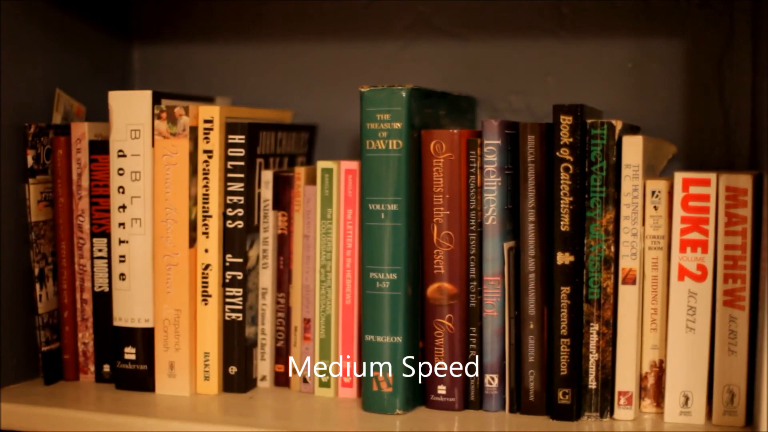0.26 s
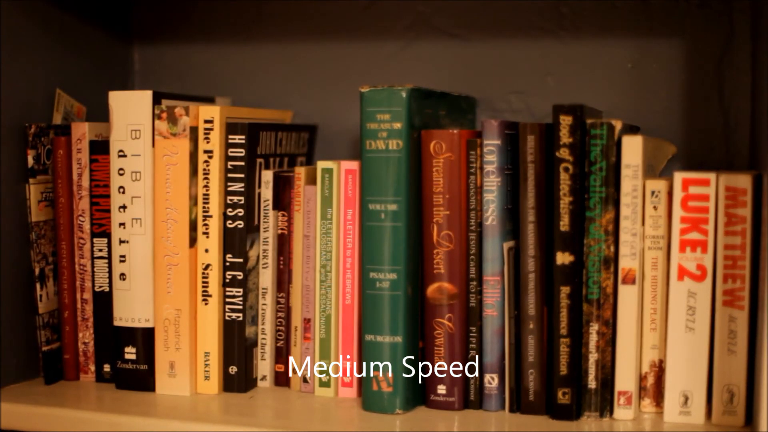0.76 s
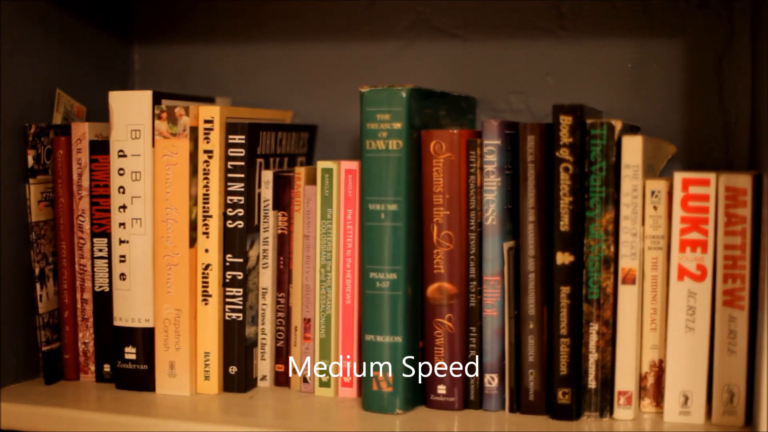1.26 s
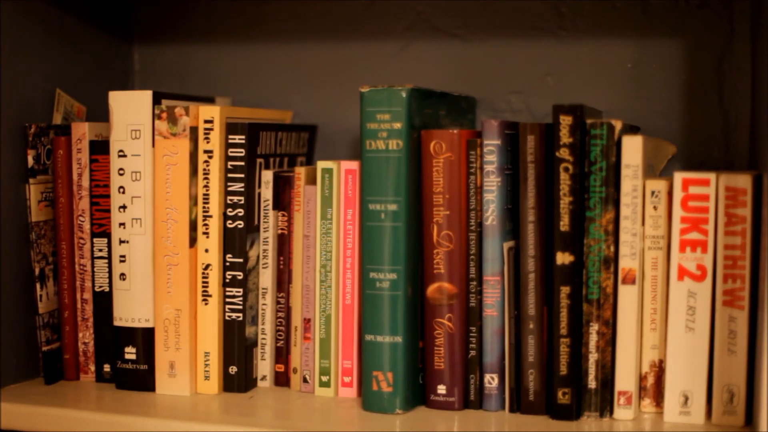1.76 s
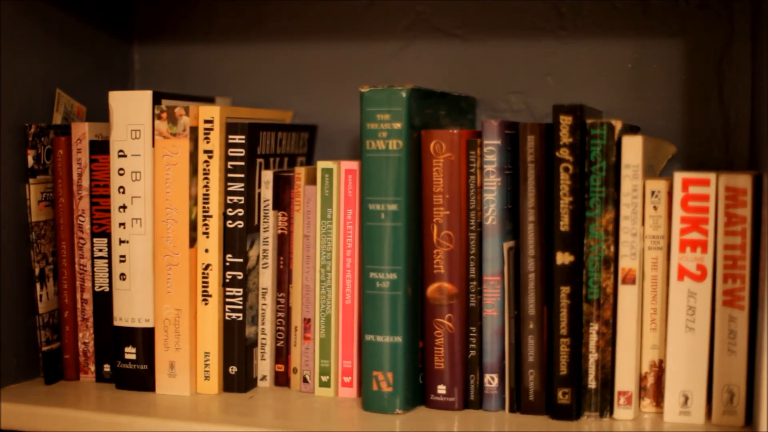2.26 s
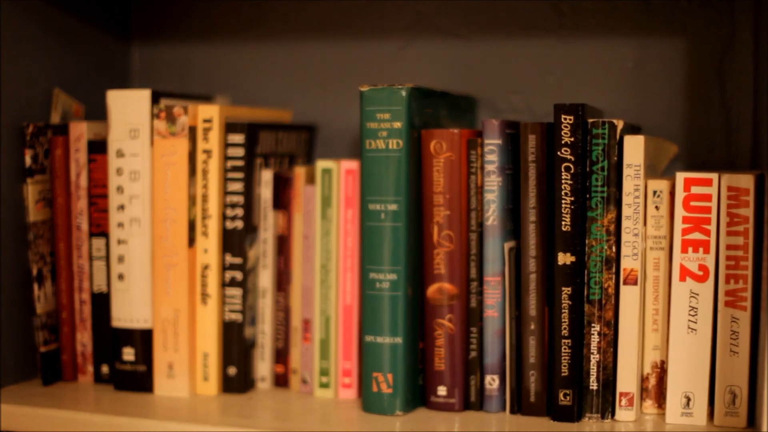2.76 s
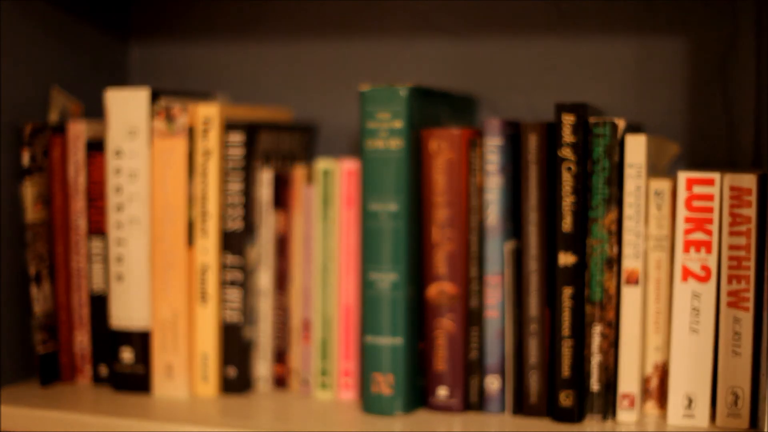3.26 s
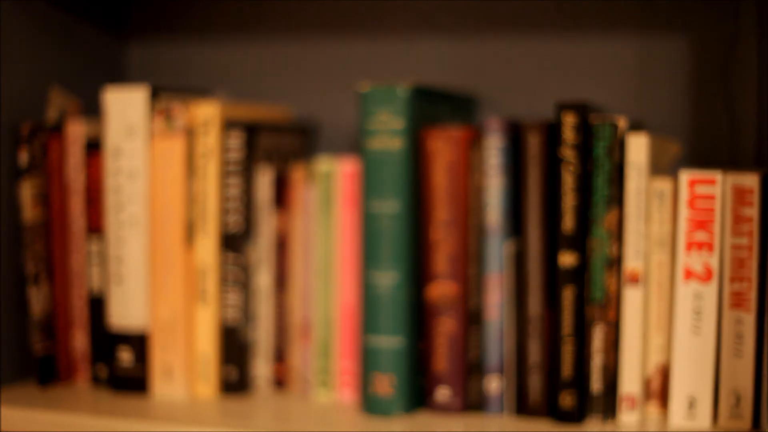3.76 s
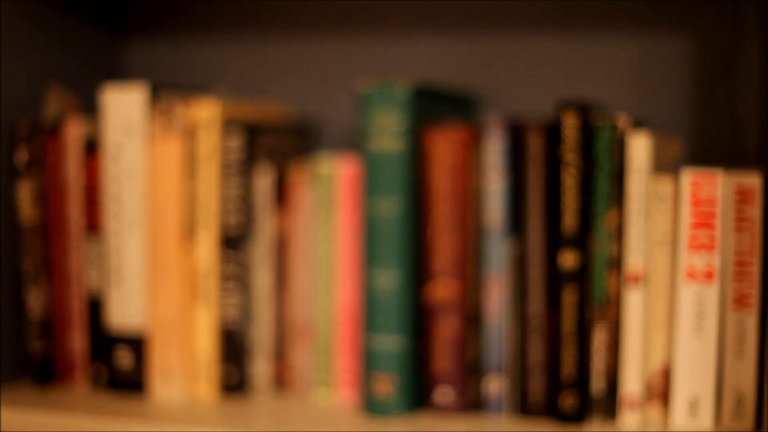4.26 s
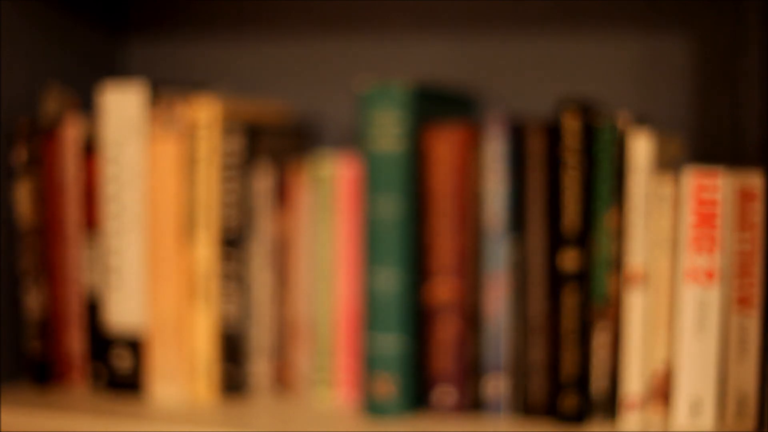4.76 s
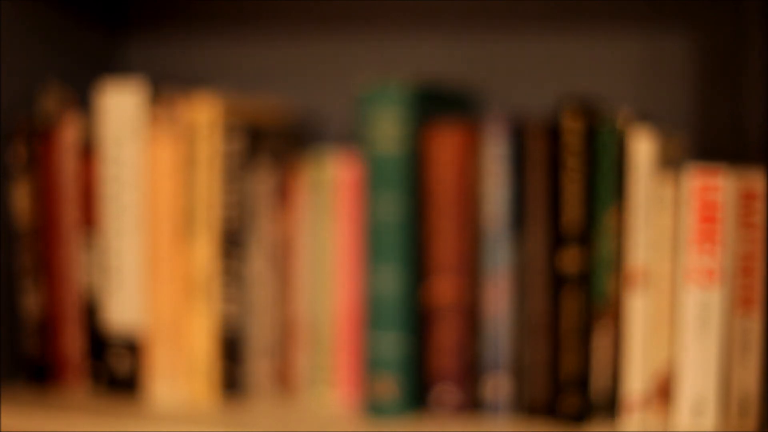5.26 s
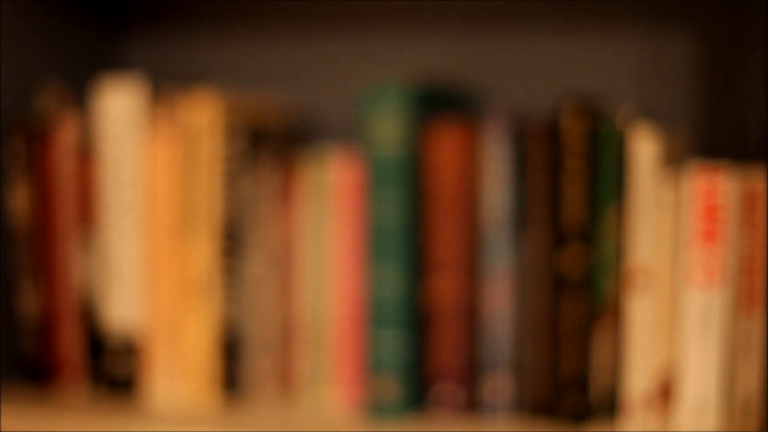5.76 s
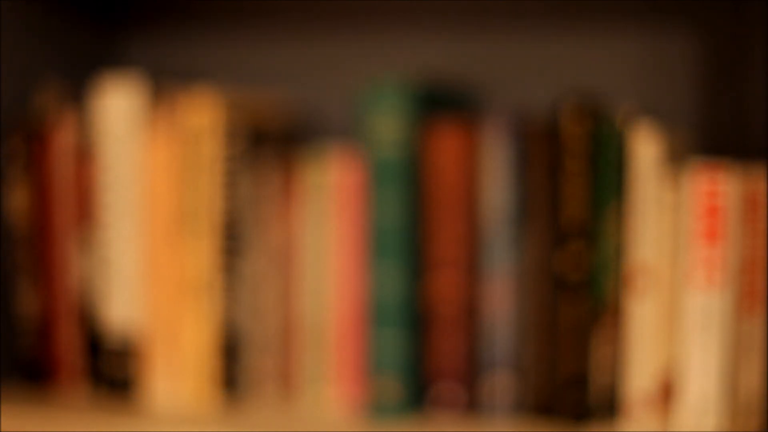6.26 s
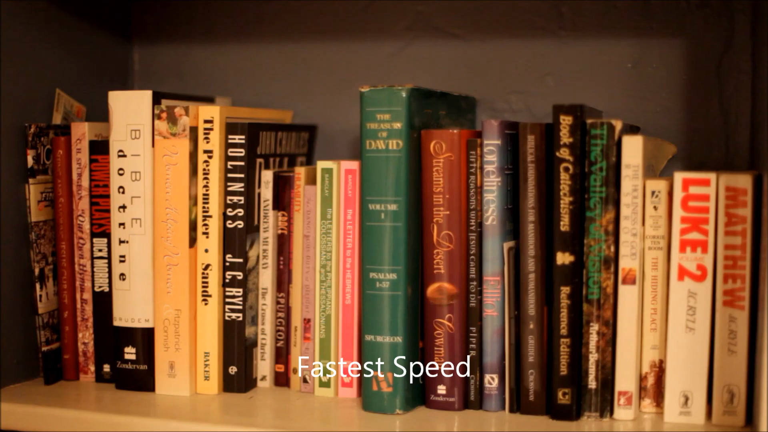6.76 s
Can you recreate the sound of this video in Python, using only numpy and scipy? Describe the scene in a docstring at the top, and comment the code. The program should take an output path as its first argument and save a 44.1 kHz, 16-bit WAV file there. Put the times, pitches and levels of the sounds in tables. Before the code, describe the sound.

Close, dry clicks of a camera lens focusing: a few steps, a pause, a button press, then a long, steady run.

```python
"""In a quiet room, a camera lens focuses in small steps, about ten a second, heard from the camera body.
In each step the motor ticks on, the gears close their slack, run for some 35 ms and stop with a clack
that rings the lens barrel. Where the lens drags, a step lasts longer and ends harder; the gears' ring
rises and falls as they turn. After a few steps and a pause, a button press opens a long run.
Under it all lie microphone hiss, a faint hum and a thin whine."""
import sys
import numpy as np
from scipy import signal
from scipy.fft import rfft, irfft
from scipy.io import wavfile

SR = 44100
rng = np.random.default_rng(int(sys.argv[2]) if len(sys.argv) > 2 else 0)


def int16_out(signal):
    """Quantize to a 16-bit WAV file."""
    q = np.round(np.clip(np.atleast_2d(signal).T, -1, 1) * 32767)
    wavfile.write(sys.argv[1], SR, q.astype(np.int16))


N = 308700
TIME = np.arange(N) / SR
AGE = np.arange(SR // 3) / SR   # seconds since a contact

# focus steps: start t/s, stop t/s, tick level/dB, level/dB of the clack's middle ring near 2 kHz
FOCUS_STEPS = [(-0.062, -0.027, -44, -27), (0.0631, 0.0955, -54, -35.5), (0.1472, 0.1792, -51, -40),
               (0.2706, 0.3037, -46, -32.5), (2.2168, 2.301, -38.5, -42.5), (2.3133, 2.349, -48.5, -35.5),
               (2.4257, 2.463, -42.5, -33.0), (2.5245, 2.5625, -40.0, -32), (2.6145, 2.6537, -39.5, -31.5),
               (2.7194, 2.7586, -40.5, -29), (2.8133, 2.8524, -39.5, -28.5), (2.9091, 2.9477, -43, -30.5),
               (3.0182, 3.0559, -44.5, -35), (3.115, 3.1563, -43, -32.5), (3.2237, 3.263, -47.0, -32.0),
               (3.3133, 3.3512, -43, -33), (3.4116, 3.4446, -38.0, -44.5), (3.521, 3.5548, -44.5, -39),
               (3.616, 3.6506, -38, -31.5), (3.7206, 3.7549, -37.5, -29), (3.8146, 3.8481, -38, -29),
               (3.9112, 3.943, -42.5, -34.5), (4.0194, 4.0548, -50, -34.5), (4.1155, 4.1495, -41, -35.5),
               (4.219, 4.2517, -46, -36.0), (4.3127, 4.3472, -45, -34), (4.409, 4.4426, -49.5, -38),
               (4.52, 4.5545, -41, -35), (4.6165, 4.652, -39.5, -31.5), (4.7196, 4.758, -43.5, -30),
               (4.816, 4.8553, -45.5, -31.0), (4.9106, 4.9505, -46.0, -31.5), (5.0212, 5.0602, -38.5, -29),
               (5.1178, 5.1573, -43, -35), (5.2161, 5.2567, -42.5, -33.5), (5.3158, 5.3572, -39.0, -29.5),
               (5.4119, 5.454, -42, -29.5), (5.524, 5.563, -42.5, -33), (5.6173, 5.6553, -41.5, -34),
               (5.7167, 5.7513, -42.5, -31.5), (5.8154, 5.851, -48, -32.0), (5.9102, 5.9446, -41.5, -32),
               (6.0232, 6.0574, -39.0, -31.0)]

# A mode is one tone of a struck part; t60 is the time it takes to fade by 60 dB.
# lens barrel: f/Hz, level/dB, t60/s
BARREL_MODES = [(617, -10.5, 0.015), (767, -12.5, 0.044), (892, -13.5, 0.045), (1014, -17, 0.072),
                (1083, -22, 0.035), (1248, -21, 0.058), (1414, -18.5, 0.041), (1668, -15, 0.036),
                (1860, -17, 0.056), (1998, -17, 0.029), (2174, -12, 0.022), (2680, -13.5, 0.027),
                (3043, -12, 0.014), (3300, -26, 0.04), (3685, -23.5, 0.023), (3880, -21.5, 0.031),
                (4190, -24, 0.022), (4810, -26.5, 0.02), (5190, -23, 0.027), (5540, -26, 0.027),
                (5970, -17, 0.014), (6900, -29, 0.027), (7340, -18, 0.0079), (8690, -13, 0.0047),
                (9170, -17.5, 0.01), (9910, -11.5, 0.0083), (11070, -21.5, 0.01), (12260, -22, 0.0044),
                (13100, -12, 0.0031)]
# how much of a harder stop reaches each barrel mode: f/Hz, factor
HARDNESS_FACTORS = [(2200, 0), (3300, 0.96), (5800, 1.7), (9500, 1), (14000, .4)]
# change in the barrel's sound per 200 Hz rise of the gears' ring: f/Hz, level/dB
TIGHTNESS_COLOUR = [(600, 1), (760, -1), (900, 4.5), (1080, 5.5), (1250, 4.5), (1700, -1.5), (1900, 1),
                    (3000, 0), (3800, -4), (4500, -0.5)]
# pitch of the gears' ring, higher where they fit tighter: t/s, f/Hz
GEAR_PITCH = [(0.3, 1775), (2.2, 1896), (2.6, 2060), (2.9, 1775), (4.1, 1680), (4.4, 1677), (4.55, 2040),
              (4.9, 1980), (5.4, 1810), (5.7, 1700)]
# gears as they meet: multiple of that pitch, level/dB, t60/s
GEAR_MODES = [(0.062, -12, 0.046), (0.158, -9, 0.026), (.29, -10, 0.03), (.48, -8.5, 0.016),
              (0.659, -17, 0.015), (.9, -13, 0.033), (1, -3, 0.026), (1.14, -4, 0.019)]
# gear housing: f/Hz, level/dB, t60/s
HOUSING_MODES = [(2610, -8, 0.034), (3352, -2, 0.018), (4160, -13, .015), (5300, -11, 0.017),
                 (6300, -14.5, 0.013), (6700, -9, 0.0098)]
# the motor's drive ring: f/Hz, level/dB, t60/s
MOTOR_MODES = [(1030, -6, 0.027), (2340, -5.5, 0.065), (3740, -10, 0.013), (5600, -3.5, 0.028),
               (6580, 0.5, 0.01), (7290, 0, 0.015), (8730, 1.5, 0.01), (9570, 8.5, 0.0046),
               (10650, -4, 0.0092), (12170, -4.5, 0.0059), (13800, -8.5, 0.0056)]
# camera body: f/Hz, level/dB, t60/s
BODY_MODES = [(88, -29, 0.0095), (183, -2.5, 0.011), (270, -9, 0.027), (270, -35.5, 0.3),
              (299.5, -21, 0.11), (300, -13.5, 0.051), (379.6, -34, 0.15)]
# lens rocking back against the gears: f/Hz, level/dB, t60/s
REBOUND_MODES = [(950, -6, 0.023), (1610, -9.5, 0.027), (1876, -11.5, 0.011), (2014, 0.5, 0.029)]
# ring of a small metal part as the lens moves along: t/s, level/dB
TING_LEVELS = [(0.3, -55), (2.4, -65.5), (2.75, -40.5), (3.3, -45), (3.8, -58), (4.3, -47.5), (5.0, -69),
               (6.1, -59)]
# button: f/Hz, level/dB, t60/s
BUTTON_MODES = [(333, -17.5, .03), (625, -5.5, 0.018), (933, -2.5, .018), (1960, -15.5, 0.028),
                (2065, -9, 0.032), (2676, 6, 0.018), (3240, -11, 0.0193), (4240, 5, 0.0047),
                (5470, 1.5, 0.0096), (6550, -13, 0.02), (7900, -2, .006)]
# clicks of the button: t/s, level/dB
BUTTON_CLICKS = [(2.2318, -36), (2.2361, -33), (2.2513, -38.5), (2.2669, -26), (2.2729, -31),
                 (2.2804, -42.5)]
# a finger settling on the button: t/s, level/dB
FINGER_LEVELS = [(2.09, -80), (2.13, -55), (2.16, -54), (2.21, -56), (2.3, -52), (2.36, -80)]

# A colour says how strong a noise is from low to high pitch.
# crack of a contact: f/Hz, level/dB
CRACK_COLOUR = [(60, -14.5), (300, 8.5), (450, 0), (900, 2), (2100, 13), (2450, 1.5), (3100, 5), (4500, -5),
                (5800, -11.5), (8000, -1), (9700, -2), (11500, -15.5), (14000, -10.5), (16500, -23.5)]
# rubbing gear teeth: f/Hz, level/dB
WHIRR_COLOUR = [(40, -34.5), (80, 2), (140, 0), (230, -6), (600, -3), (1300, -3), (1750, 3.5), (2200, -1),
                (2800, -10), (4300, -13.5), (5500, -13), (8000, -16), (9700, -14), (11500, -33.5)]
# rubbing fingertip: f/Hz, level/dB
FINGER_COLOUR = [(130, -8), (220, 0), (450, 0), (1200, -3), (2500, -13), (8000, -28)]
# the room's soft, low echo: f/Hz, level/dB
ROOM_COLOUR = [(120, -12), (230, -15), (275, -1), (300, 3.5), (335, -16), (420, -23), (650, -13.5),
               (2000, -24.5), (6000, -27), (14000, -37)]
# microphone hiss: f/Hz, level/dB
HISS_COLOUR = [(30, 0), (60, -1), (110, .5), (290, 1), (500, -3.5), (1000, -5.5), (2000, -7), (4000, -8.5),
               (7000, -10), (10000, -13.5), (15800, -17.5)]

# mains hum and the whine of the electronics: f/Hz, level/dB
STEADY_TONES = [(120, -77.5), (5609, -72)]


def stop_clacks(clack_db, middle_hz, middle_width_hz, snap_db, snap_dull_hz, tip_db):
    """The lens stops against its gears and rings the barrel; a harder stop sounds brighter."""
    out, shapes = np.zeros(N), steady_modes(BARREL_MODES, swell_s=0.001, span_s=0.014)
    hz = np.array(BARREL_MODES)[:, 0]
    reach, mesh_db = look_up(HARDNESS_FACTORS, hz), look_up(TIGHTNESS_COLOUR, hz)
    middle = np.exp(-((hz - middle_hz) / middle_width_hz) ** 2)
    dull = signal.butter(1, snap_dull_hz, fs=SR, output="sos")
    for start, stop, _, middle_db in FOCUS_STEPS:
        harder_db = 900.5 * drag_s(start, stop)   # about 0.9 dB per extra millisecond
        fuller_db = middle_db + 34   # the usual middle ring is -34 dB
        boost_db = harder_db * reach + tightness(start) * mesh_db + fuller_db * middle
        ring = strike(shapes, vary_db=1.17, scatter=0.8, boost_db=boost_db)
        ring = rattle(ring, rattle_db=-5, t60=0.004, above_hz=3000)
        snap = signal.sosfilt(dull, crack(t60=0.022, tail_db=-2, tail_t60=0.079))
        snap *= from_db(snap_db + 0.88 * fuller_db)
        bright = from_db(tip_db + 0.49 * harder_db) * crisp_tip(t60=0.01, above_hz=8900)
        add(out, stop, from_db(clack_db) * (ring + snap + bright))
    return out


def gears_meeting(slack_s, early_db, full_db, housing_db):
    """The gears close their slack: a light touch, then a full one. Both also ping the housing."""
    out, housing = np.zeros(N), mode_shapes(HOUSING_MODES, swell_s=0.0004)
    for start, stop, *_ in FOCUS_STEPS:
        ring_hz = look_up(GEAR_PITCH, start)
        step_db = -39 - 300 * drag_s(start, stop)   # drag softens the contact
        shapes = mode_shapes([(k * ring_hz, db, t60) for k, db, t60 in GEAR_MODES], swell_s=0.0025)
        for share, db in ((0.6, early_db), (1, full_db)):
            ring = level_one(strike(shapes, vary_db=1.8, scatter=0.6), span_s=0.009)
            ping = from_db(housing_db) * strike(housing, vary_db=1.2, scatter=0.72)
            grit = from_db(-1) * crack(t60=0.014, tail_db=-22, tail_t60=0.05)
            when = start + share * slack_s + rng.normal(0, 0.0004)
            add(out, when, from_db(step_db + db) * (ring + ping + grit))
    return out


def running_gears(spin_up_s, coast_s, grain_db, grains_hz):
    """Gear teeth rub unevenly through each step, and the whirr dies away after the stop."""
    drive = np.zeros(N)
    spin_up = 1 - np.exp(-(AGE / spin_up_s) ** 2)
    for start, stop, *_ in FOCUS_STEPS:
        run_db = -44 - 282 * drag_s(start, stop)   # drag makes the gears run more quietly
        coast = np.exp(-np.maximum(AGE - (stop - start), 0) / coast_s)
        add(drive, start, from_db(run_db) * spin_up * coast)
    grain = np.interp(TIME * grains_hz, np.arange(N), rng.standard_normal(N))
    return drive * from_db(grain_db * grain - 1.23) * noise(WHIRR_COLOUR, N)


def motor_ticks():
    """The motor switches on with a thin, bright tick."""
    out, shapes = np.zeros(N), mode_shapes(MOTOR_MODES, swell_s=0.00033)
    for start, _, tick_db, _ in FOCUS_STEPS:
        tick = level_one(strike(shapes, vary_db=1.5, scatter=0.99), span_s=0.0024)
        bright = from_db(-5.5) * crisp_tip(t60=0.008, above_hz=6400)
        add(out, start, from_db(tick_db + 0.9) * (tick + bright))
    return out


def body_thumps(usual_db):
    """Each stop nudges the whole camera: a low thump, softer where the gears fit tighter."""
    out, shapes = np.zeros(N), steady_modes(BODY_MODES, swell_s=0.0012, span_s=0.023)
    for start, stop, *_ in FOCUS_STEPS:
        thump = strike(shapes, vary_db=0.48, scatter=0.54)
        add(out, stop, from_db(usual_db - 2 * tightness(start)) * thump)
    return out


def rebounds(delay_s, rebound_db):
    """Just after each stop the lens rocks back: a softer contact with only middle tones."""
    out, shapes = np.zeros(N), mode_shapes(REBOUND_MODES, swell_s=0.00059)
    for _, stop, _, middle_db in FOCUS_STEPS:
        ring = level_one(strike(shapes, vary_db=2.0, scatter=0.8), span_s=0.008)
        add(out, stop + delay_s + rng.normal(0, 0.00028), from_db(middle_db + rebound_db) * ring)
    return out


def metal_tings(hz, t60):
    """At some lens positions a small metal part rings on after the clack, thin and high."""
    out, ring = np.zeros(N), np.sin(2 * np.pi * hz * AGE) * fade(t60)
    for _, stop, *_ in FOCUS_STEPS:
        add(out, stop, from_db(look_up(TING_LEVELS, stop)) * ring)
    return out


def button_press(dull_hz):
    """A fingertip rubs on the camera, then the button clicks down, muffled by the finger."""
    clicks, shapes = np.zeros(N), mode_shapes(BUTTON_MODES, swell_s=0.00064)
    for when, db in BUTTON_CLICKS:
        ring = level_one(strike(shapes, vary_db=2.0, scatter=0.8), span_s=0.003)
        snap = from_db(-5) * crack(t60=0.035, tail_db=-18, tail_t60=0.091)
        add(clicks, when, from_db(db) * (ring + snap))
    muffled = signal.sosfilt(signal.butter(4, dull_hz, fs=SR, output="sos"), clicks)
    rub = from_db(look_up(FINGER_LEVELS, TIME)) * noise(FINGER_COLOUR, N)
    return muffled + rub


def room_echo(room_db, t60, build_s):
    """Sound scattered around the room builds up after each clack and dies away."""
    out = np.zeros(N)
    bloom = (1 - np.exp(-(AGE / build_s) ** 2)) * fade(t60)
    for _, stop, *_ in FOCUS_STEPS:
        add(out, stop, from_db(room_db) * bloom * noise(ROOM_COLOUR, len(AGE)))
    return out


def background(hiss_db):
    """The microphone hisses, the mains hum faintly and the electronics whine."""
    tones = sum(np.sqrt(2) * from_db(db) * np.sin(2 * np.pi * hz * TIME) for hz, db in STEADY_TONES)
    return from_db(hiss_db) * noise(HISS_COLOUR, N) + tones


def drag_s(start, stop, usual_s=0.037, held_s=0.06):
    """How much longer than usual a step lasts. Past held_s the button holds it up, not drag."""
    return stop - start - usual_s if stop - start < held_s else 0


def tightness(when, usual_hz=1877):
    """How much tighter than usual the gears fit, counted in 200 Hz rises of their ring."""
    return (look_up(GEAR_PITCH, when) - usual_hz) / 200


def mode_shapes(modes, swell_s):
    """One fading tone per mode. Low bending waves travel slower, so low tones swell later."""
    hz, db, t60 = np.transpose(modes)[:, :, None]
    swell = 1 - np.exp(-(AGE / swell_s) ** 2 * hz / 1000)   # swell_s holds at 1 kHz
    signs = (-1) ** np.arange(len(modes))[:, None]
    return signs * swell * from_db(db) * fade(t60) * np.exp(2j * np.pi * hz * AGE)


def steady_modes(modes, swell_s, span_s):
    """Mode shapes scaled so that an average blow starts at level 1."""
    shapes = mode_shapes(modes, swell_s)
    powers = np.mean(np.abs(shapes[:, :int(span_s * SR)]) ** 2, axis=1) / 2
    return shapes / np.sqrt(np.sum(powers))


def strike(shapes, vary_db, scatter, boost_db=0):
    """One blow: each mode gets a random strength and a random shift of its wave (scatter, radians)."""
    strength, phase = rng.standard_normal((2, len(shapes)))
    weights = from_db(boost_db + vary_db * strength) * np.exp(1j * scatter * phase)
    return (weights @ shapes).imag


def rattle(ring, rattle_db, t60, above_hz):
    """Hard parts chatter briefly as they meet, striking the high modes again and again."""
    length = SR // 100
    chatter = rng.standard_normal(length) * fade(t60)[:length]
    chatter = cut_lows(chatter / np.linalg.norm(chatter), above_hz)
    return ring + from_db(rattle_db) * signal.fftconvolve(ring, chatter)[:len(ring)]


def crack(t60, tail_db, tail_t60):
    """Countless small modes blur into a burst of noise with a softer, longer tail."""
    attack = 1 - np.exp(-AGE / 0.000068)
    return noise(CRACK_COLOUR, len(AGE)) * attack * (fade(t60) + from_db(tail_db) * fade(tail_t60))


def crisp_tip(t60, above_hz):
    """The first instant of a hard contact: a very short, high hiss."""
    return cut_lows(rng.standard_normal(len(AGE)) * fade(t60), above_hz)


def noise(colour, size):
    """Noise of level 1 with the given colour."""
    hz, db = np.transpose(colour)
    bin_hz = np.maximum(np.arange(size // 2 + 1) * SR / size, 1)
    gain = from_db(np.interp(np.log(bin_hz), np.log(hz), db))
    gain *= np.minimum(bin_hz / hz[0], 1)   # falls away below the lowest listed pitch
    x = irfft(rfft(rng.standard_normal(size)) * gain, size)
    return x / np.std(x)


def from_db(db):
    """Turn decibels into a gain."""
    return 10 ** (np.asarray(db) / 20)


def fade(t60):
    """A gain that falls by 60 dB every t60 seconds."""
    return from_db(-60 * AGE / t60)


def look_up(table, at):
    """Read between the rows of a two-column table."""
    return np.interp(at, *np.transpose(table))


def cut_lows(x, hz):
    """Weaken everything below hz."""
    return signal.sosfilt(signal.butter(2, hz, "high", fs=SR, output="sos"), x)


def level_one(x, span_s):
    """Scale a sound to an average level (rms) of 1 over its first span_s seconds."""
    return x / np.sqrt(np.mean(x[:int(span_s * SR)] ** 2) + 1e-20)


def add(track, when, sound):
    """Mix a sound into the track at a time in seconds."""
    at = int(round(when * SR))
    part = sound[max(-at, 0):max(N - at, 0)]
    track[max(at, 0):max(at, 0) + len(part)] += part


def scene():
    """Lens, button, a little of the room and the background, mixed into one channel."""
    lens = motor_ticks() + gears_meeting(slack_s=0.006, early_db=-3, full_db=-1.5, housing_db=0.5)
    lens += running_gears(spin_up_s=0.0012, coast_s=0.011, grain_db=3.0, grains_hz=709)
    lens += stop_clacks(clack_db=-34, middle_hz=1914, middle_width_hz=520,
                        snap_db=-6, snap_dull_hz=4030, tip_db=-5)
    lens += body_thumps(usual_db=-40) + rebounds(delay_s=0.00296, rebound_db=-4.0)
    lens += metal_tings(hz=9600, t60=0.06)
    room = room_echo(room_db=-52.0, t60=0.65, build_s=0.02)
    return (lens + room + button_press(dull_hz=8600) + background(hiss_db=-59.2))[None]


def record(dry):
    """The microphone thins the deep bass, the sound switches off near the end, the top treble is cut."""
    off_s, fade_s, top_hz = 6.657, 0.0053, 16200
    live = np.clip((off_s - TIME) / fade_s + 1, 0, 1)
    cut_highs = signal.ellip(10, 0.1, 80, top_hz, fs=SR, output="sos")
    return signal.sosfilt(cut_highs, cut_lows(dry, hz=45) * live)


dry = scene()
out = record(dry)
int16_out(out)
```